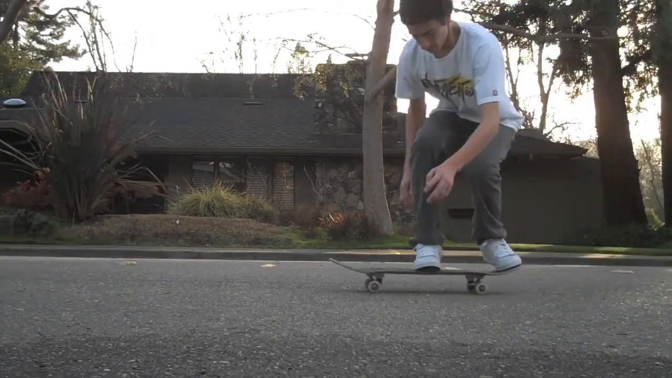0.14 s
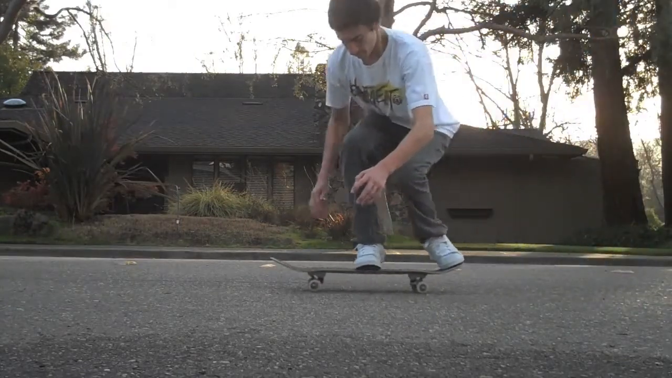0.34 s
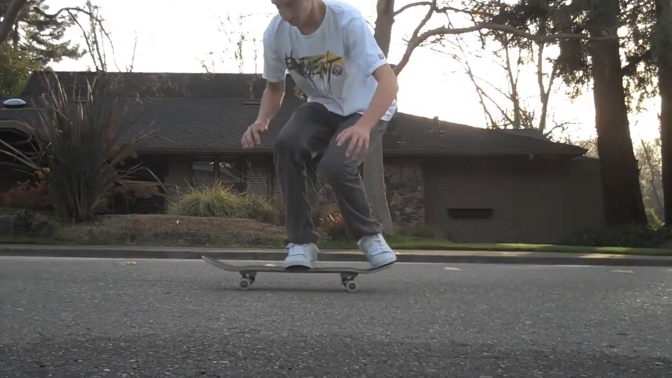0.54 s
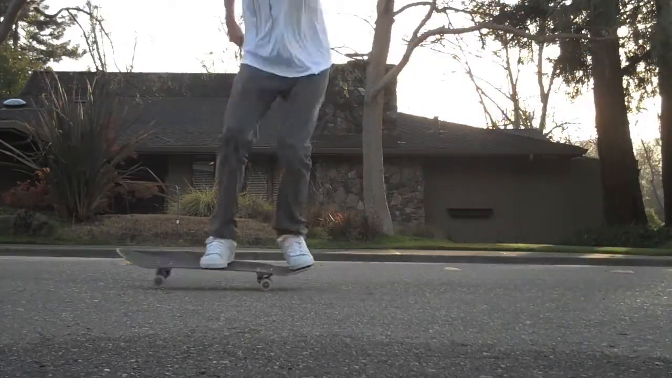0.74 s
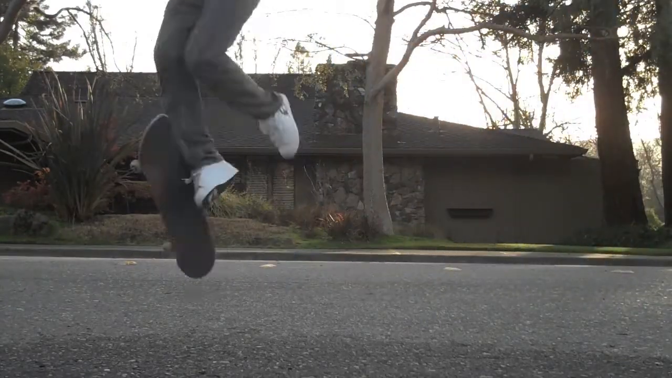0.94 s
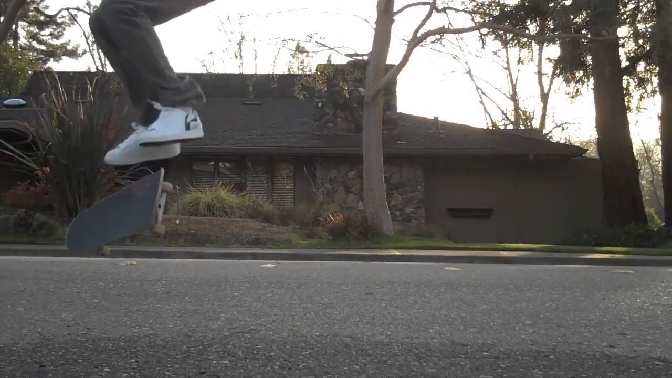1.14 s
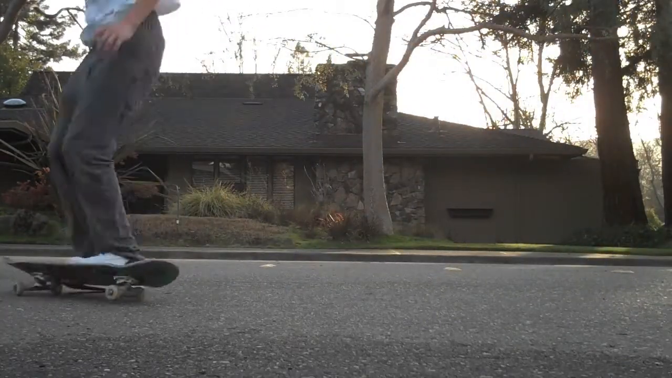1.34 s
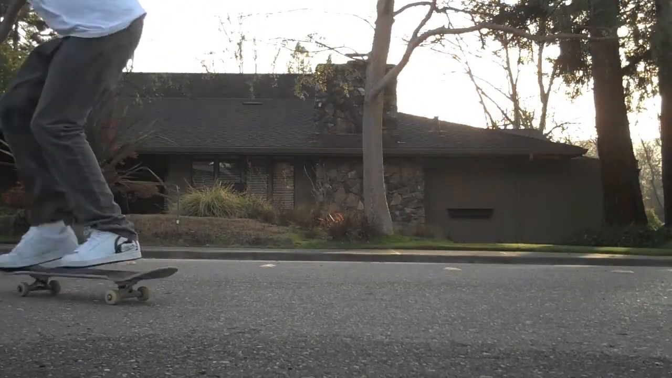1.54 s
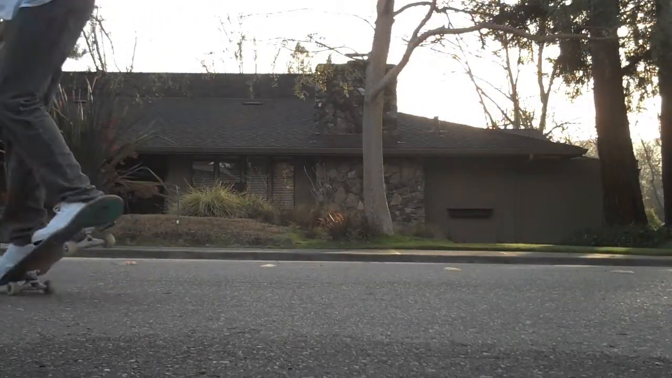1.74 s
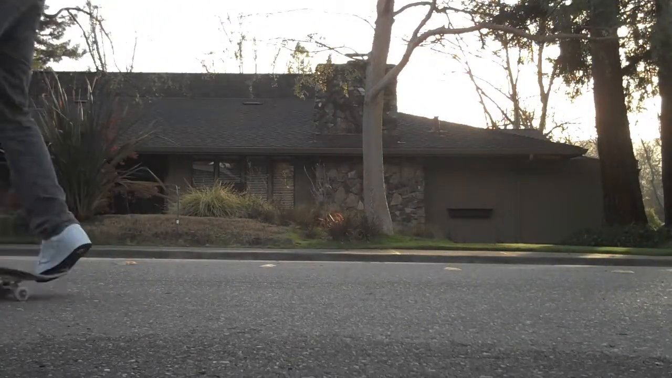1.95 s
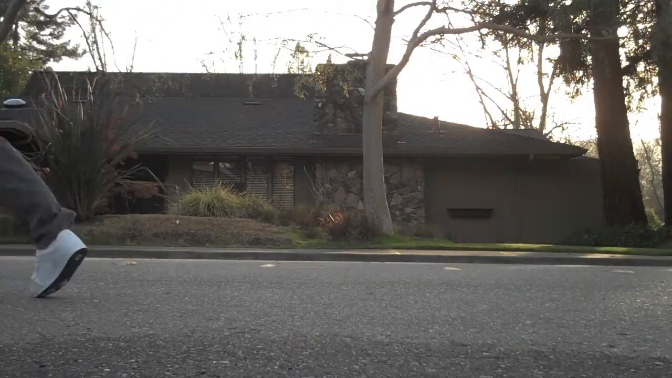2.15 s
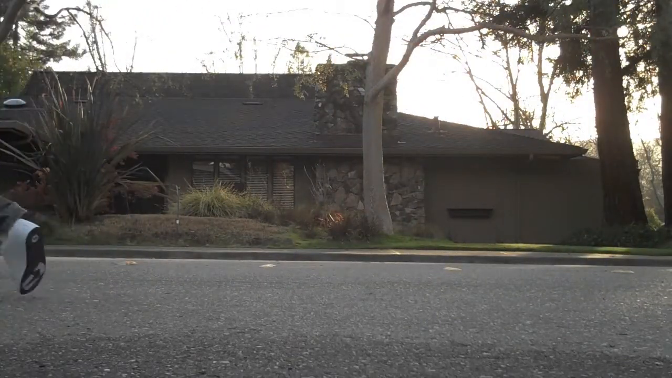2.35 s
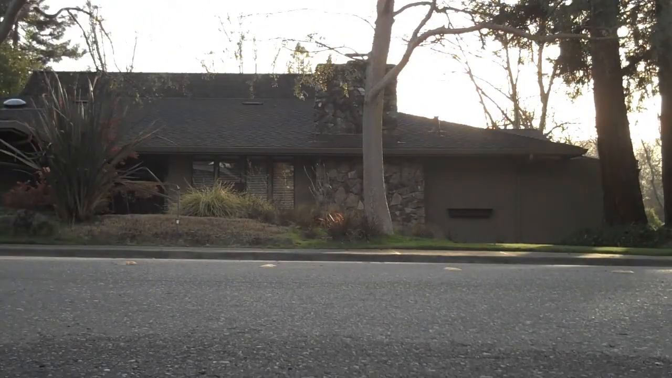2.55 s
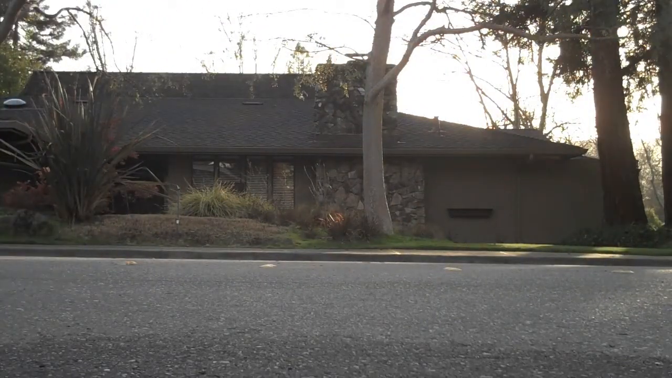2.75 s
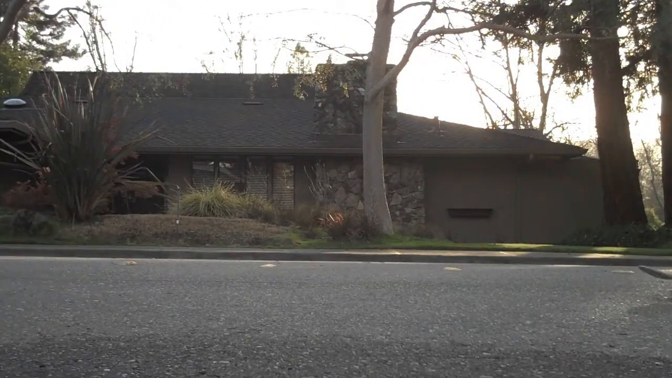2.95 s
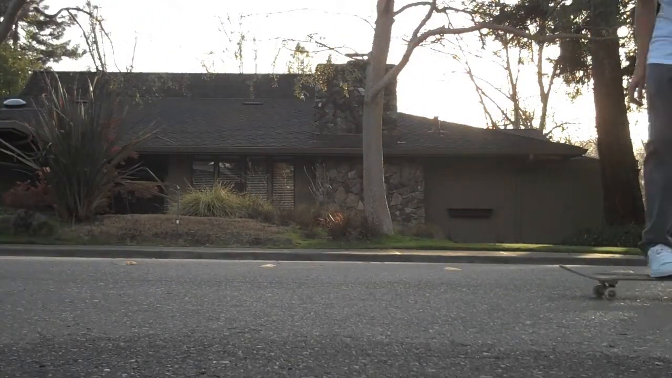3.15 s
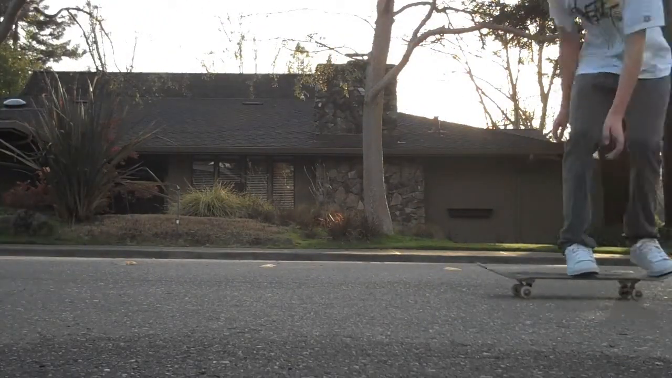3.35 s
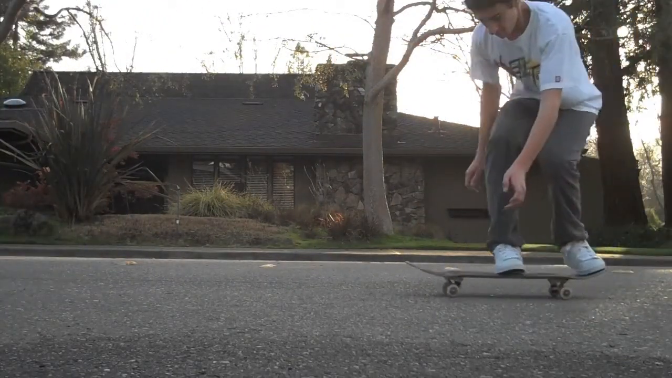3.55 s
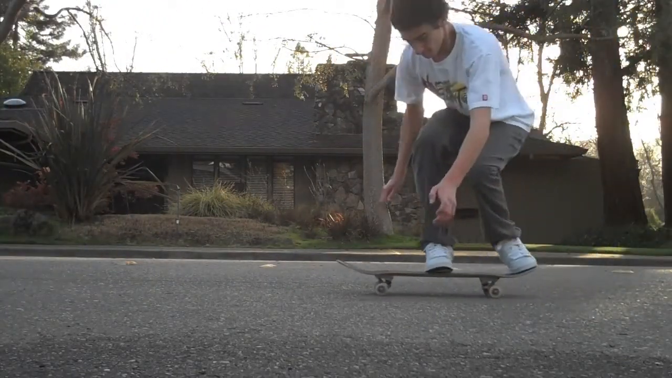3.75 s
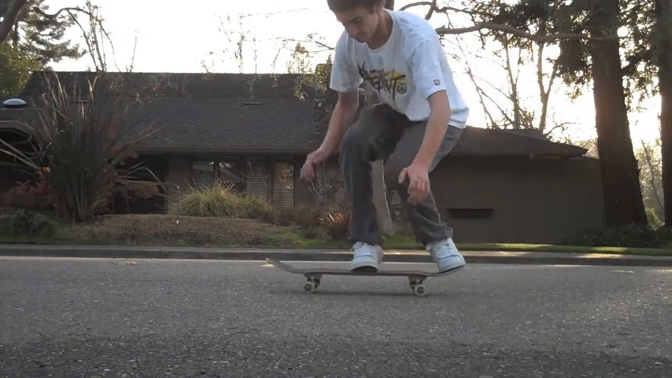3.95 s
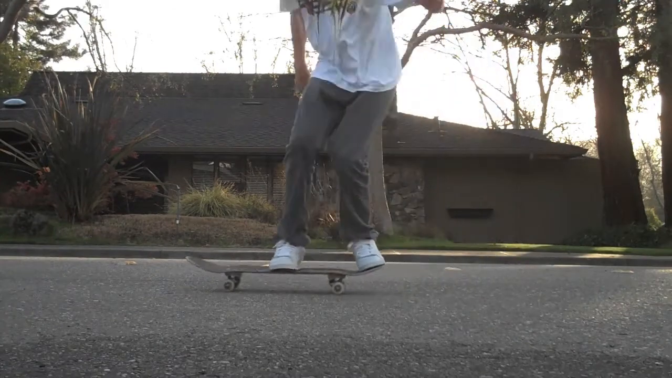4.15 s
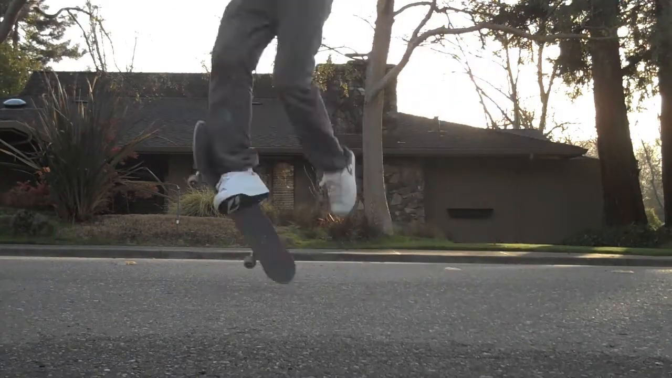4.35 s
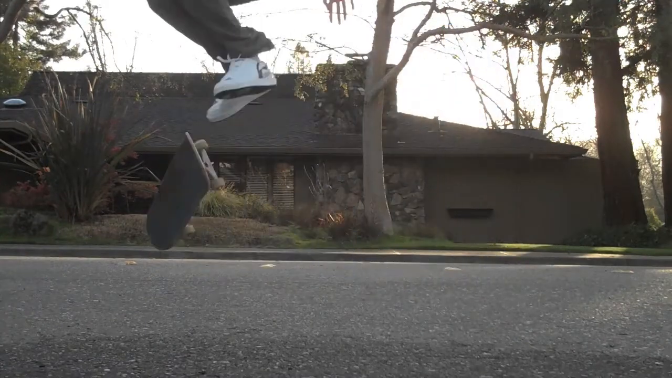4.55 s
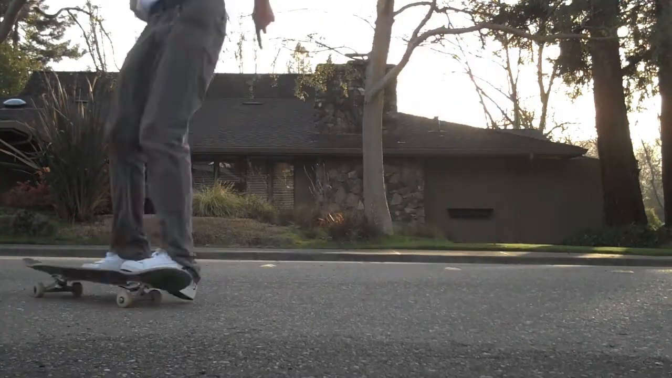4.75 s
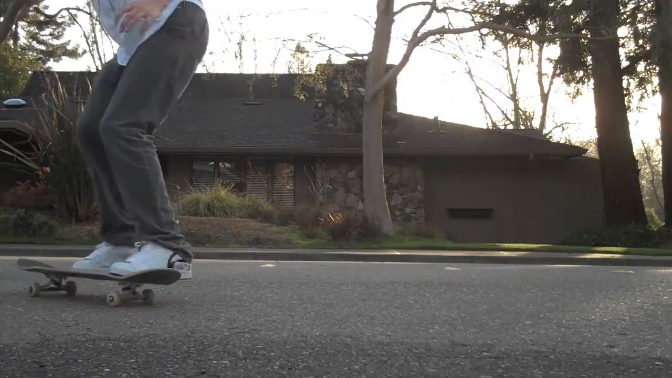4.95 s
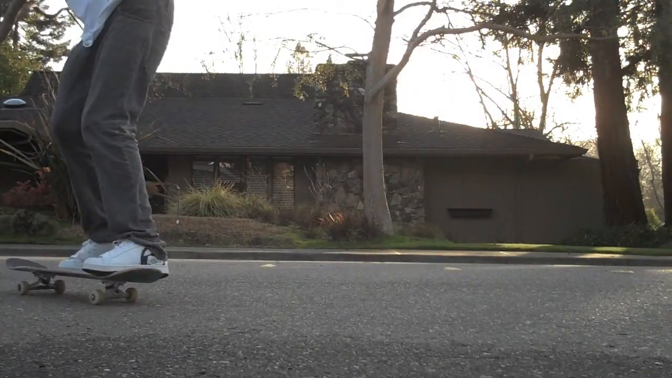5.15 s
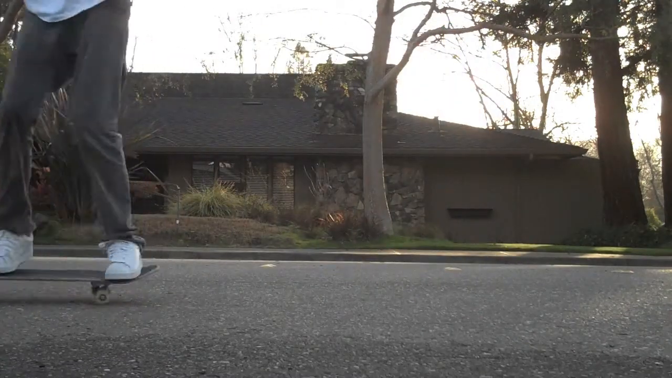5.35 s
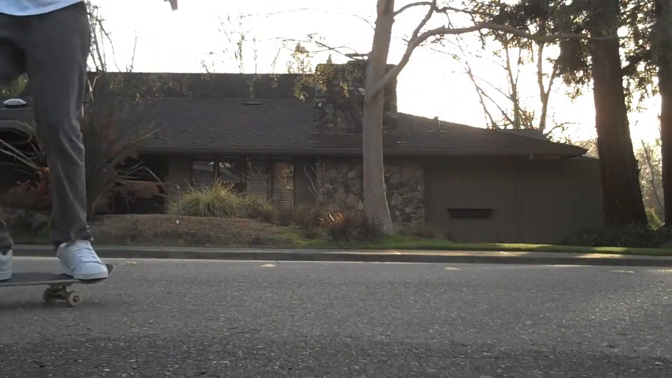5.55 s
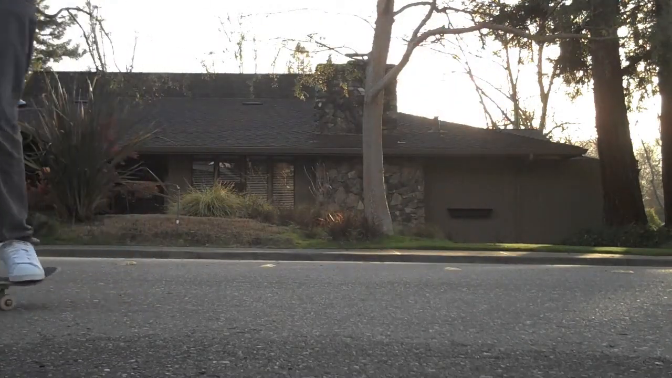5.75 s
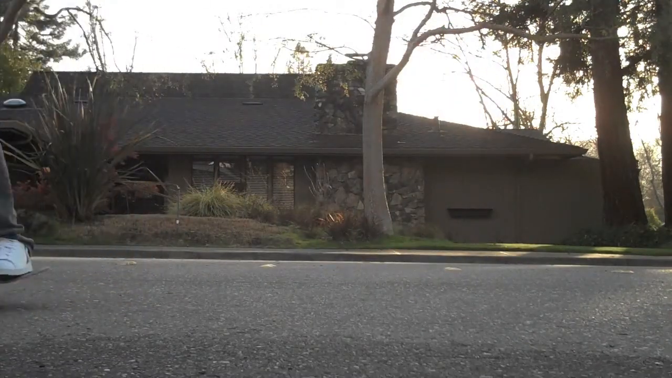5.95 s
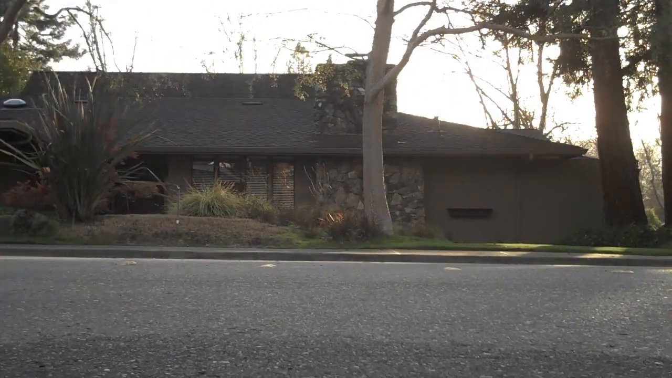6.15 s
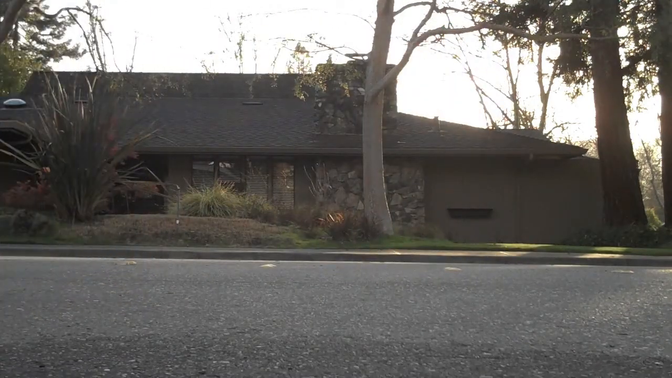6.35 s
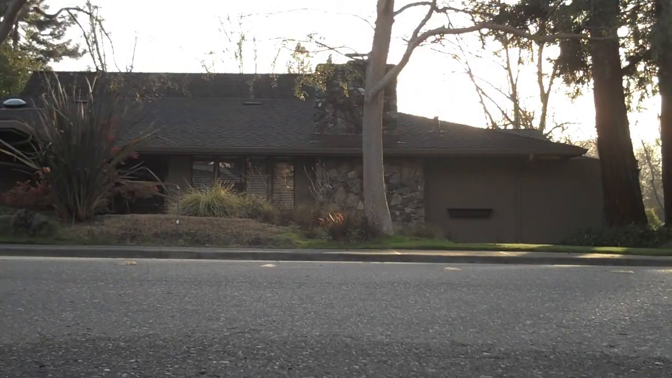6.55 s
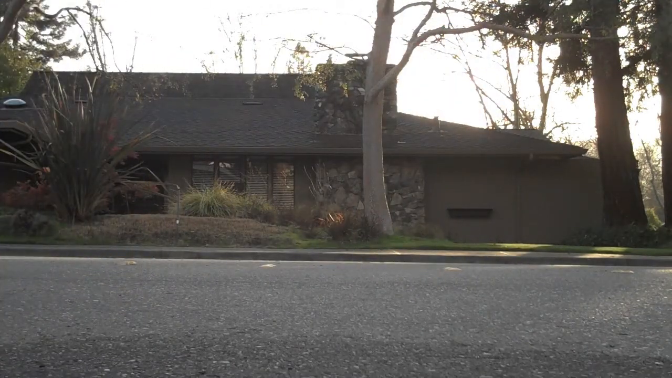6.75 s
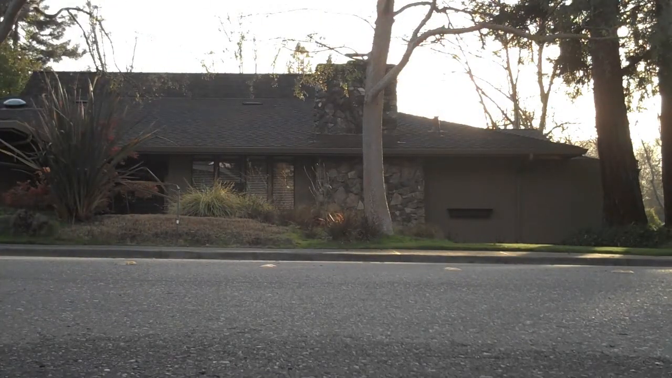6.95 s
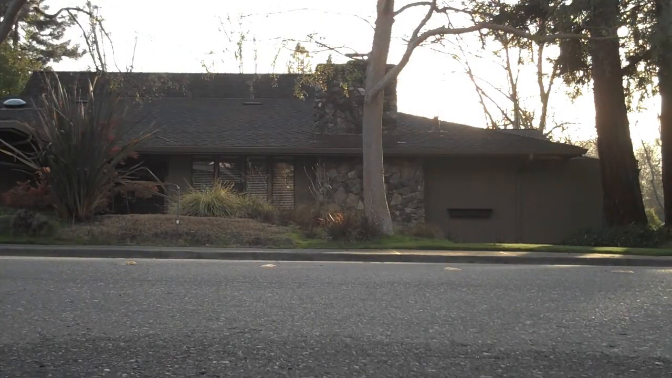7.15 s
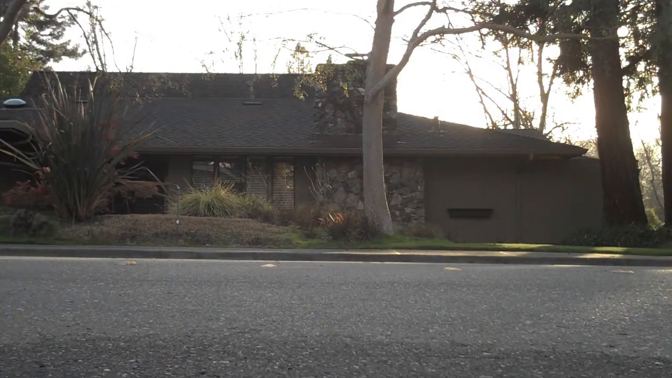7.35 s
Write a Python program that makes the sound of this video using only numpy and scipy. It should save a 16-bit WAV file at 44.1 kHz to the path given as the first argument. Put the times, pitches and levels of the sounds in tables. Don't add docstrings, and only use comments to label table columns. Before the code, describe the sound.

A quiet street, microphone near the road, faint hiss and distant traffic hum. From 0 to 0.8 s hard skateboard wheels roll over rough asphalt, grainy with small stone ticks. At 0.82 s the tail cracks very loudly and dry; the rolling thins to a light whirr until 1.25 s, when the board slams down in a dense burst of woody hits and rattle. Light rail knocks come at 1.6 and 1.8 s, then a hard slap with a scuff at 2.0 s. A brief low hum fades out by 2.54 s. A brighter, grittier run-up follows, with many ticks, to a sharp pop at 4.27 s and a heavy clattering landing at 4.7 s. Loose taps and scrapes cluster at 5.3-5.5 s, then sparse shoe scuffs, grit ticks and small knocks until 6.9 s. After a fade, from 7.0 s, dull, narrow rumbling roll surges twice to the end.

```python
import sys
import numpy as np
from scipy import signal
from scipy.fft import rfft, irfft
from scipy.io import wavfile
from scipy.ndimage import uniform_filter1d, map_coordinates

SR = 44100
rng = np.random.default_rng(int(sys.argv[2]) if len(sys.argv) > 2 else 0)


def invert_db(level):
    return 10 ** (np.asarray(level, dtype=float) / 20)


def materialize(psi):
    bounded = np.clip(np.atleast_2d(psi).T, -1, 1)
    quanta = np.round(bounded * 32767).astype(np.int16)
    wavfile.write(sys.argv[1], SR, quanta)


N = 326340
TIME = np.arange(N) / SR

# t/s, load level/dB, sharpness of the stones/dB
LOAD = [
    [(0, -45, 2.5), (.18, -51.5, 3), (.45, -50.5, 2), (.72, -44, 4), (.82, -49.5, 3.5), (1.32, -49, -4.5),
     (1.62, -59, 1), (2.04, -42, -2.5), (2.44, -56, 3)],
    [(2.62, -48.5, 1.5), (2.74, -46.5, 0.5), (3.14, -44, 6), (3.42, -48, 2), (4.24, -48, 3),
     (4.86, -54, 0.5), (5.16, -65, 4.5), (5.7, -64, 9.5), (6.9, -57.5, 0)],
]
# start t/s, end t/s
FREE_ROLL = [
    (0, .82),
    (2.55, 4.26),
]
# start t/s, end t/s
UNWEIGHTED = [
    (.96, 1.4),
    (4.408, 5.4),
]
# f/Hz, width/Hz, level/dB
DECK_MODES = [(254, 300, -9), (402.5, 141, 3), (504, 134, 2), (725, 180, -2), (970, 130, -4.5)]
TRUCK_MODES = [(1400, 700, -3), (2030, 700, 1.5), (2567, 2600, -7.5)]
GRIT_MODES = [(3330, 1400, 2.5), (5860, 3460, 3.5), (7240, 1700, 6.5), (10350, 2500, -4.5)]
DECK_DB, TRUCKS_DB, GRIT_DB = 1.55, -2.5, -7.5
AIR_DECK_DB, AIR_SPIN_DB, AIR_GRIT_DB = -2, 3.5, -15
UNLOADED_DECK_DB = -4
SPIN_HZ = 1500

# f/Hz, level/dB, t60/s
PLYWOOD = [(481, 0, 0.19), (630, -2, 0.014), (1055, 3.5, 0.011), (1210, 1, 0.084), (1484, -17, 0.0483),
           (1660, 5, 0.025), (1839, -8.5, 0.04), (2060, -4, 0.04), (2300, -24.5, .05), (2420, -24, .05),
           (2930, -13, 0.11), (2900, -18, .04), (3206, -15.5, 0.0046), (3400, 4.5, 0.072)]
# t/s, peak level/dB, ring f/Hz, crack level/dB re peak, t60/s
POPS = [(.8232, -4, 2960, -19, 0.011), (.8255, -4.5, 2600, -17, 0.012), (.829, -16.5, 1500, -0.5, 0.025),
        (.8412, -19.5, 1900, -8.5, 0.0159), (.844, -16.5, 1210, -13, 0.06),
        (4.2655, -3.5, 3100, -16, 0.014), (4.268, -17, 2300, -17, 0.02), (4.271, -18.5, 1200, -15, 0.03),
        (4.2848, -13, 1130, -10.5, 0.011), (4.291, -22, 1180, -25, 0.061),
        (4.8175, -18.5, 1940, -1.5, 0.0094)]
# t/s, peak level/dB, ring f/Hz, crack level/dB re peak, t60/s
LANDINGS = [(1.2472, -11.5, 1500, -3, 0.027), (1.2495, -9, 1090, 3, 0.03), (1.2548, -1, 2330, -17.5, 0.015),
            (1.262, -7, 2040, -1, 0.036), (1.275, -15.5, 2340, -5.5, 0.11),
            (1.2875, -16.5, 1090, -2, 0.047), (1.295, -20.5, 1500, 2.5, 0.017),
            (1.302, -17.5, 1010, -1.5, 0.022), (1.308, -30, 1800, -6, 0.03),
            (1.315, -23.5, 1400, -6, 0.018), (1.35, -23.5, 1940, 0, 0.038), (1.3742, -16.5, 2600, 0, 0.011),
            (1.9872, -4.5, 1400, -2.5, 0.017), (1.99, -6.5, 746, -23, 0.025),
            (2.0, -14.5, 633, -15.5, 0.011), (2.014, -16.5, 720, 2, 0.029),
            (4.637, -28.5, 630, -3.5, 0.085), (4.642, -28.5, 1140, 0, 0.011),
            (4.6905, -3.5, 750, -0.5, 0.037), (4.6932, -1, 2110, -19.5, 0.047),
            (4.7, -10, 2400, -16.5, 0.027), (4.7052, -2, 2410, -15, 0.022),
            (4.715, -16.5, 1950, 2.5, 0.072), (4.7228, -9, 1020, -27, 0.019),
            (4.7352, -14.5, 1310, -7, 0.041), (4.74, -8.5, 650, -4, 0.02), (4.76, -29.5, 655, -3, 0.094)]
# t/s, peak level/dB, ring f/Hz, t60/s
CLATTER = [(5.271, -33, 1500, 0.02), (5.288, -25, 1650, 0.028), (5.2964, -37.5, 1380, 0.0091),
           (5.302, -16.5, 2130, 0.012), (5.312, -24, 1540, 0.0098), (5.315, -20.5, 1700, 0.016),
           (5.321, -27.5, 1500, 0.035), (5.343, -17, 2050, 0.013), (5.351, -23.5, 1850, .033),
           (5.3689, -15, 2320, 0.02), (5.394, -19.5, 1510, 0.025), (5.408, -24.5, 1210, 0.058),
           (5.421, -22.5, 2020, 0.035), (5.439, -23.5, 1600, 0.016), (5.449, -25.5, 1460, 0.054),
           (5.468, -35, 1100, 0.0068), (5.844, -22.5, 1910, 0.018), (5.849, -29.5, 1660, 0.023),
           (5.857, -30, 1720, 0.019), (6.388, -27.5, 1500, 0.044), (6.401, -28.5, 780, 0.011),
           (6.834, -23.5, 1660, 0.059), (6.841, -24.5, 1940, 0.02), (6.848, -19, 1430, 0.0066),
           (6.895, -29.5, 1520, 0.013)]
# t/s, peak level/dB, ring f/Hz, t60/s
RAIL_TAPS = [
    (1.594, -18, 1800, 0.018),
    (1.5956, -12.5, 1630, 0.015),
    (1.8186, -18.5, 1340, 0.07),
    (1.822, -12, 1750, 0.011),
    (1.827, -22, 1590, 0.1),
    (1.836, -20, 1560, 0.033),
    (1.841, -12, 1550, 0.017),
]
# t/s, peak level/dB, ring f/Hz
STONES = [(0.0393, -34, 501), (0.1518, -31, 856), (0.3022, -37, 503), (0.3273, -31, 736),
          (0.4032, -33, 584), (0.4413, -38, 528), (0.5704, -36, 783), (0.628, -26.5, 514),
          (0.6569, -27, 510), (0.6767, -28, 496), (0.7043, -29, 721), (0.729, -25, 2030),
          (2.6372, -28, 756), (2.6951, -38, 501), (2.756, -39, 587), (2.8044, -32, 1930),
                (2.8318, -20, 1860), (2.8772, -34, 1920), (2.9036, -36, 829), (2.9465, -34, 860),
                (2.975, -29, 2410), (3.0019, -40, 1820), (3.0259, -49, 985), (3.0673, -41, 818),
                (3.0882, -28, 686), (3.1151, -28, 646), (3.1386, -26.5, 634), (3.1725, -21, 1540),
                (3.2005, -36, 624), (3.2239, -20, 2140), (3.2439, -24.5, 590), (3.2873, -32, 1510),
                (3.3107, -36, 603), (3.3287, -23.5, 719), (3.3746, -30, 910), (3.4125, -28, 1570),
                (3.4554, -23, 557), (3.5676, -40, 528), (3.5881, -47, 544), (3.626, -39, 767),
                (3.6504, -45, 727), (3.6824, -29, 2290), (3.7258, -26.5, 568), (3.7801, -21.5, 563),
                (3.8325, -34, 528), (3.867, -43, 501), (3.8879, -52, 746), (3.93, -52, 729),
                (4.0016, -47, 528), (4.0356, -36, 525), (4.05, -24.5, 528), (4.0805, -30, 681),
                (4.1044, -23, 1790), (4.1583, -18.5, 1790), (4.1892, -31, 501)]
# t/s, peak level/dB, ring f/Hz
TICKS = [(0.9176, -29, 3630), (1.2076, -22, 1830), (1.5489, -29.5, 1210), (1.625, -35, 1700),
         (1.6462, -44, 1640), (1.664, -32, 1480), (1.719, -44, 1260), (1.7395, -48, 1620),
         (1.761, -37, 1050), (1.9037, -28, 1060), (1.9315, -32, 4270), (1.955, -28, 1990),
         (1.9674, -20, 1790), (2.0782, -30, 1060), (2.088, -30, 1060), (2.1086, -21.5, 1500),
         (2.1204, -26, 2280), (2.1466, -29, 1390), (4.974, -42, 1020), (5.034, -38, 1590),
         (5.0844, -40, 1320), (5.2042, -41, 4370), (5.2225, -33, 1870), (5.2406, -36, 3050),
         (5.386, -25, 1510), (5.6237, -37.5, 2230), (5.6664, -32, 1540), (5.6795, -48, 3100),
         (5.6805, -34, 1480), (5.7046, -31, 2090), (5.7175, -29, 1590), (5.7358, -38, 1640),
         (5.7417, -34, 1660), (5.756, -31, 1750), (5.7667, -25, 1760), (5.7786, -26, 1980),
         (5.7964, -40, 2150), (5.814, -31, 2080), (5.88, -40, 6290), (5.8966, -37, 2720),
         (5.9937, -30, 2030), (6.0332, -37, 1940), (6.0523, -31, 1760), (6.064, -30.5, 2130),
         (6.119, -31, 1800), (6.1409, -35, 2450), (6.163, -27, 1430), (6.1799, -28, 1880),
         (6.2005, -30, 1170), (6.2224, -34, 1500), (6.2398, -27.5, 1700), (6.4703, -38.5, 1500),
         (6.532, -40.5, 1300), (6.6279, -36, 1110), (6.678, -31, 2010), (6.7233, -31, 2870),
         (6.773, -34, 1810), (6.8135, -39, 1650)]
POP_THUD_DB, LANDING_THUD_DB = -31, -4
CLATTER_CRACK_DB, CLATTER_THUD_DB = 0.5, -10
RAIL_CRACK_DB, RAIL_THUD_DB = -20, -42
STONE_DB, TICK_DB = -4, -3.5
STONE_CRACK_DB, TICK_CRACK_DB = -2.5, 0
RISE_PER_T60 = 0.053
FIRST_TOUCH = 1.72
POP_RATTLE_DB = -1.5

# t/s, swell/s, fade/s, level/dB, ring f/Hz
SCUFFS = [(.79, 0.057, 0.0063, -39, 1500), (.935, 0.013, 0.0086, -46, 3200),
          (1.249, 0.016, 0.064, -36, 1500), (1.544, 0.042, 0.015, -39, 905),
          (1.85, 0.028, 0.017, -49, 1400), (1.89, 0.031, 0.02, -49, 3380), (1.93, 0.04, 0.024, -36, 1500),
          (1.987, 0.0028, 0.021, -24, 1400), (2.058, 0.034, 0.057, -40.5, 634),
          (4.645, 0.012, 0.039, -47, 1090), (4.691, 0.005, 0.021, -19.5, 1220),
          (2.8, 0.035, 0.015, -41, 1810), (4.272, 0.018, 0.042, -45, 2000),
          (6.86, 0.013, 0.027, -48.5, 1700), (6.69, .012, .015, -52.5, 1500),
          (1.378, .005, 0.035, -50, 3000), (4.35, 0.031, 0.029, -50.5, 3200),
          (4.83, 0.0082, 0.028, -49, 1480), (5.017, 0.025, 0.015, -48, 1620),
          (5.19, 0.053, 0.022, -55.5, 3800), (5.272, 0.035, 0.033, -37.5, 920),
          (5.335, 0.02, 0.016, -45, 1030), (5.38, .02, 0.088, -42.5, 1400),
          (5.664, 0.035, 0.043, -50, 1540), (5.731, 0.017, 0.015, -41.5, 1620),
          (5.764, 0.006, 0.062, -43.5, 1930), (6.029, 0.017, 0.099, -52.5, 1440),
          (6.108, 0.04, 0.27, -49, 1230), (6.669, 0.034, 0.0042, -50.5, 1700),
          (6.766, 0.015, 0.0084, -55.5, 4800), (6.8, 0.052, 0.02, -46.5, 1640)]
SCUFF_GRIT_DB = -5
# start t/s, end t/s, f/Hz, level/dB
RUNAWAY = (2.37, 2.54, 600, -56)

# t/s, rolling level/dB
LAST = [
    (7.03, -48),
    (7.116, -40),
    (7.188, -47.5),
    (7.238, -49),
    (7.345, -45.5),
    (7.364, -40),
    (7.4, -45.5),
]
# f/Hz, width/Hz, level/dB
LAST_RUMBLE = [(72, 106, -10.5), (109, 29, -1), (188, 75, -11.5)]
LAST_ROLL = [(435, 124, -1), (920, 250, -7.5), (1590, 420, -8), (2520, 810, -18.5)]
LAST_RUMBLE_DB, LAST_RUMBLE_FOLLOWS = -43, 0.41
# t/s, fade-out/s, fade-in/s
JOINS = [
    (2.54, 0.072, 0.055),
    (6.978, 0.099, 0.11),
]

# f/Hz, level/dB per Hz
HISS = [(250, -3.5), (500, 1), (1000, 4), (2200, -7.5), (4000, -18.5), (9000, -21), (14000, -51.5)]
HISS_DB = -56
TRAFFIC_DB, GROUND_FOLLOWS = -66, 0.13
DUCK_DB, DUCK_BACK_S = -4.5, .25

# start t/s, end t/s
GAIN_CLIMBS = [
    (1.75, 1.98),
    (2.34, 2.47),
    (2.6, 2.66),
    (5.17, 5.3),
    (5.73, 5.84),
    (6.18, 6.38),
    (6.73, 6.82),
    (7.34, 7.4),
]
# f/Hz, level/dB re its neighbourhood
KEPT = [(6000, -14), (9000, -9), (11500, -5.5), (14000, -3.5)]
TOP_HZ, TOP_DB = 14000, -89.5


def rolling():
    load_db, sharp_db = in_time(np.concatenate(LOAD))
    air = sum(np.clip(np.minimum(TIME - a, b - TIME) / .05, 0, 1) for a, b in UNWEIGHTED)
    loaded = sum((TIME > a) & (TIME < b) for a, b in FREE_ROLL)
    unloaded = uniform_filter1d(1. - loaded, size=2000)
    jolts = bumps(per_s=65.0, spread_db=3.0, decay_s=0.0012) * np.where(loaded, 1, .15)
    white = rng.standard_normal((3, N))
    deck = unit(band(body(white[0] * (1 + 0.2 * jolts), DECK_MODES), 170, 1300))
    trucks = unit(band(body(white[1] * (1 + 0.56 * jolts), TRUCK_MODES), 680, 3100))
    spin = unit(resonate(white[1], SPIN_HZ, 1300.0) * invert_db(1.5 * uniform_filter1d(jolts, size=900)))
    grit = unit(band(body(white[2] * (1 + 0.47 * jolts), GRIT_MODES), 2000, 14500))
    deck_gain = invert_db(DECK_DB - 0.78 * sharp_db + AIR_DECK_DB * air + UNLOADED_DECK_DB * unloaded)
    trucks_gain = invert_db(TRUCKS_DB + AIR_SPIN_DB * air)
    grit_gain = invert_db(GRIT_DB + sharp_db + AIR_GRIT_DB * air)
    wheels = trucks_gain * ((1 - air) * trucks + air * spin)
    return invert_db(load_db) * (deck_gain * deck + wheels + grit_gain * grit)


def bumps(per_s, spread_db, decay_s):
    sizes = invert_db(spread_db * np.minimum(rng.exponential(1, N), 3))
    jolts = (rng.random(N) < per_s / SR) * sizes
    return unit(decaying_sum(jolts + 1e-18, decay_s))


def tail_pops():
    return knocks(blows_of(POPS, POP_THUD_DB), wood_db=-13.0, sharp=3.0)


def slams():
    clatter = [(s, db, hz, CLATTER_CRACK_DB, t60) for s, db, hz, t60 in CLATTER]
    taps = [(s, db, hz, RAIL_CRACK_DB, t60) for s, db, hz, t60 in RAIL_TAPS]
    rows = blows_of(LANDINGS, LANDING_THUD_DB)
    rows += blows_of(clatter, CLATTER_THUD_DB) + blows_of(taps, RAIL_THUD_DB)
    return knocks(rows, wood_db=-7.0, sharp=2.67)


def stones_and_ticks():
    stones = [(s, db + STONE_DB, hz, STONE_CRACK_DB, .016) for s, db, hz in STONES]
    ticks = [(s, db + TICK_DB, hz, TICK_CRACK_DB, .012) for s, db, hz in TICKS]
    return knocks(blows_of(stones, -18.0) + blows_of(ticks, -25.0), wood_db=-8.0, sharp=1.7)


def blows_of(rows, thud_db):
    return [(s, db, hz, crack_db, thud_db, t60) for s, db, hz, crack_db, t60 in rows]


def knocks(rows, wood_db, sharp):
    size = 3500
    age, out = np.arange(size) / SR, np.zeros(N + size)
    noise = rng.standard_normal((len(rows), size))
    shares = rng.normal(0, 0.83, (len(rows), len(PLYWOOD)))
    strike = 1 + 0.84 * np.exp(-age / 0.00032)
    for (s, peak_db, hz, crack_db, thud_db, t60), burst, share_db in zip(rows, noise, shares):
        rise = np.minimum(age / (RISE_PER_T60 * t60), 1)
        burst = burst * strike * invert_db(-60 * age / max(t60, .005)) * rise
        burst[:7] += FIRST_TOUCH * np.hanning(7)
        wood = sum(invert_db(db + d) * resonate(burst, f, 4.3 / mode_t60)
                   for (f, db, mode_t60), d in zip(PLYWOOD, share_db))
        width_hz = 500 + hz / sharp
        ring = resonate(resonate(burst, hz, width_hz), hz, width_hz)
        crack = burst * invert_db(-60 * age / 0.19)
        crack = band(crack, 2720, 7140) + 0.18 * band(crack, 6000, 9600) + 0.11 * band(crack, 10000, 13000)
        boom = 1.4 * invert_db(peak_db) * band(burst * invert_db(-60 * age / 0.015), 56, 200)
        thud = band(burst, 240, 1013) + boom
        parts = [ring, crack, thud, band(wood, 330, 3300)]
        levels = invert_db([-2.5, crack_db + 1.5, thud_db - 5.5, wood_db])
        at = round(s * SR)
        out[at:at + size] += invert_db(peak_db) * sum(g * p / np.abs(p).max() for g, p in zip(levels, parts))
    return out[:N]


def scuffs():
    slip_rate = bumps(per_s=820.0, spread_db=7.0, decay_s=0.00078)
    slips = unit(rng.standard_normal((2, N)) * (0.5 + 0.6 * slip_rate))
    grit = unit(band(body(slips[1], GRIT_MODES), 2400, 13500))
    out = np.zeros(N)
    for start, swell, fade, level_db, hz in SCUFFS:
        span = slice(round(start * SR), round((start + swell + fade) * SR))
        stroke = np.sqrt(np.interp(TIME[span] - start, [0, swell, swell + fade], [0, 1, 0]))
        ring = unit(resonate(resonate(slips[0, span], hz, 1.4 * hz), hz, 1.4 * hz))
        out[span] += invert_db(level_db) * stroke * (ring + invert_db(SCUFF_GRIT_DB) * grit[span])
    return out


def runaway():
    start, end, hz, level_db = RUNAWAY
    hum = resonate(resonate(rng.standard_normal(N), hz, 70), hz, 70)
    return invert_db(level_db) * unit(hum) * np.clip(np.minimum(TIME - start, end - TIME) / 0.026, 0, 1)


def last_attempt():
    roll_db, = in_time(LAST)
    rumble_db = LAST_RUMBLE_DB + LAST_RUMBLE_FOLLOWS * (roll_db + 46.5)
    jolts = bumps(per_s=60.0, spread_db=3.0, decay_s=0.005)
    white = rng.standard_normal((2, N))
    rumble = invert_db(rumble_db) * body(white[0], LAST_RUMBLE)
    roll = invert_db(roll_db) * body(white[1] * (1 + 0.57 * jolts), LAST_ROLL)
    return signal.sosfilt(signal.ellip(12, 1, 70, 3480, fs=SR, output="sos"), rumble + roll)


def hardware_rattle(blows):
    return scatter(blows, level_db=-11.5, t60=0.074, delay_s=0.0094, top_hz=6700, lumpy=2.77)


def street_echo(blows):
    return scatter(blows, level_db=-20.5, t60=0.9, delay_s=0.012, top_hz=3600, lumpy=0.3)


def scatter(x, level_db, t60, delay_s, top_hz, lumpy):
    age = np.arange(SR // 2) / SR
    returns = rng.standard_normal(len(age)) * rng.exponential(1, len(age)) ** lumpy
    returns = returns * invert_db(-60 * age / t60) * (age > delay_s)
    return invert_db(level_db) * signal.fftconvolve(band(x, 420, top_hz), returns / np.linalg.norm(returns))[:N]


def street(duck):
    hz = np.fft.rfftfreq(N, 1 / SR)
    hiss_hz, hiss_db = np.transpose(HISS)
    colour = invert_db(np.interp(np.log(hz + 1), np.log(hiss_hz), hiss_db, left=-40))
    hiss = unit(irfft(rfft(rng.standard_normal(N)) * colour, N))
    hum = unit(band(rng.standard_normal(N), 120, 260) + 0.39 * band(rng.standard_normal(N), 15, 90))
    load_db = in_time(np.concatenate(LOAD))[0]
    hum_gain = invert_db(TRAFFIC_DB + GROUND_FOLLOWS * (load_db + 48.0)) * duck
    return invert_db(HISS_DB) * hiss + hum_gain * hum


def ducking(blows):
    recent = decaying_sum(blows ** 2, DUCK_BACK_S)
    return invert_db(DUCK_DB * np.sqrt(recent / recent.max()))


def unit(x):
    return x / np.sqrt(np.mean(x ** 2) + 1e-20)


def in_time(rows):
    s, *columns = np.transpose(rows)
    return [np.interp(TIME, s, c) for c in columns]


def decaying_sum(x, decay_s):
    return signal.lfilter([1], [1, -np.exp(-1 / (decay_s * SR))], x)


def resonate(x, hz, width_hz):
    r = np.exp(-np.pi * width_hz / SR)
    poles = [1, -2 * r * np.cos(2 * np.pi * hz / SR), r * r]
    return signal.lfilter([(1 - r * r) / 2, 0, (r * r - 1) / 2], poles, x)


def body(x, peaks, patchy_db=1.62):
    total = 0
    for k, (hz, width_hz, db) in enumerate(peaks):
        total = total + (-1) ** k * invert_db(db + patchy_db * drift(35.0)) * resonate(x, hz, width_hz)
    return unit(total)


def drift(per_s):
    points = rng.standard_normal(400)
    return map_coordinates(points, [np.minimum(TIME * per_s, 398)], order=3)


def band(x, lo_hz, hi_hz):
    return signal.sosfilt(signal.butter(2, [lo_hz, min(hi_hz, .45 * SR)], "band", fs=SR, output="sos"), x)


def scene():
    pops = tail_pops()
    ground_blows = slams() + stones_and_ticks()
    rattle = hardware_rattle(ground_blows + invert_db(POP_RATTLE_DB) * pops)
    blows = ground_blows + pops
    near = rolling() + blows + scuffs() + runaway() + rattle + street_echo(blows) + street(ducking(blows))
    fade = np.ones(N)
    for s, out_s, in_s in JOINS:
        fade = fade * np.clip(np.maximum((s - TIME) / out_s, (TIME - s) / in_s), .01, 1)
    return (fade * np.where(TIME < JOINS[-1][0], near, last_attempt()))[None]


def drop_weak_treble(x):
    hz, _, cells = signal.stft(x, SR, nperseg=1024)
    patch = uniform_filter1d(np.abs(cells), size=6, axis=1)
    around = uniform_filter1d(np.abs(cells), size=40, axis=1)
    kept = patch > around * invert_db(np.interp(hz, *np.transpose(KEPT), left=-99))[:, None]
    kept &= (hz < TOP_HZ)[:, None] | (patch > invert_db(TOP_DB))
    return signal.istft(cells * kept, SR, nperseg=1024)[1][:, :N]


def top_cut(x):
    return signal.sosfilt(signal.butter(12, 15060, fs=SR, output="sos"), x)


def record(dry):
    climbing = sum((TIME > a) & (TIME < b) for a, b in GAIN_CLIMBS)
    steps = climbing * (np.arange(N) % round(SR / 30) == 0) * invert_db(-59.0)
    climb = decaying_sum(steps + 1e-18, .07)
    fast, slow = decaying_sum(dry ** 2, .012), decaying_sum(dry ** 2, .11)
    offset = climb - invert_db(-60.5) * fast - invert_db(-80.0) * slow - invert_db(-68.5)
    offset = signal.sosfilt(signal.butter(2, 90, fs=SR, output="sos"), offset)
    rounded = 0.73 * np.tanh(dry / 0.81) + offset
    dull = signal.sosfilt(signal.butter(5, 13700, fs=SR, output="sos"), rounded)
    return top_cut(drop_weak_treble(dull))


dry = scene()
out = record(dry)
materialize(out)
```